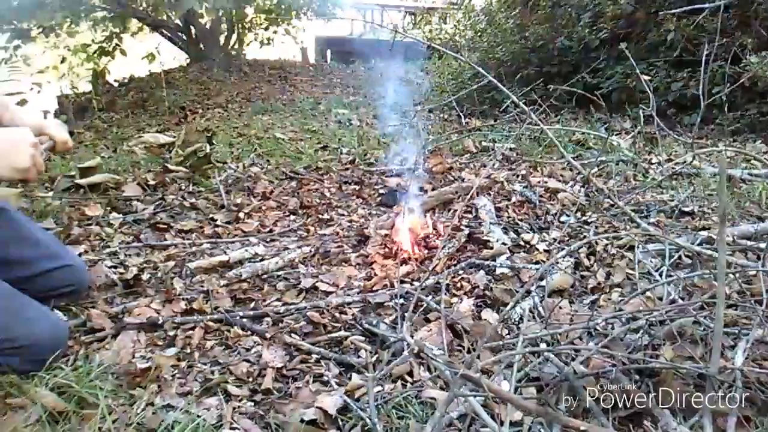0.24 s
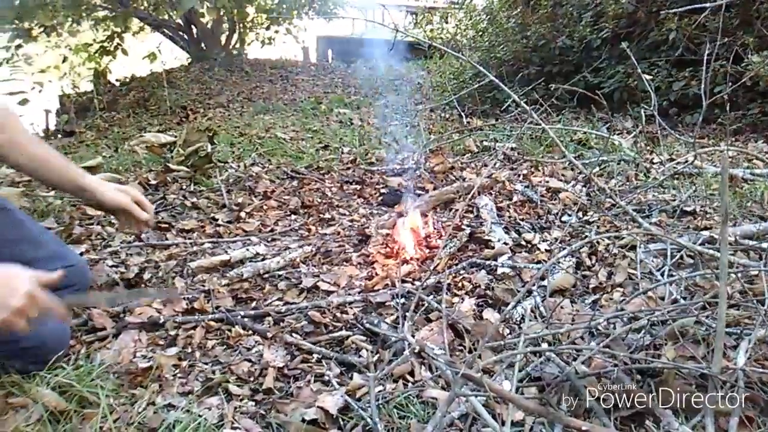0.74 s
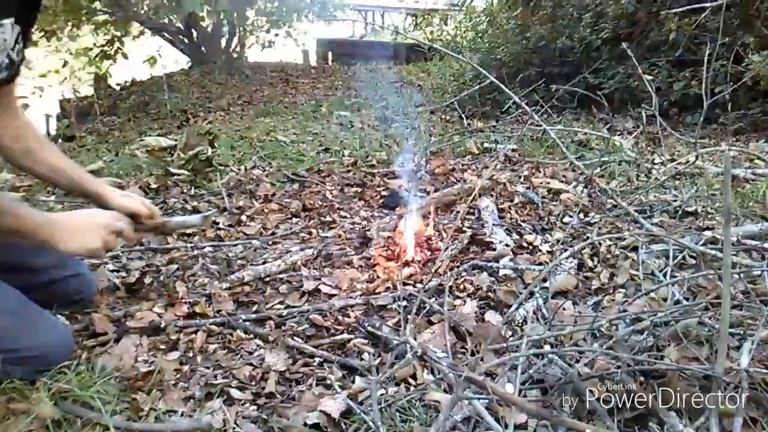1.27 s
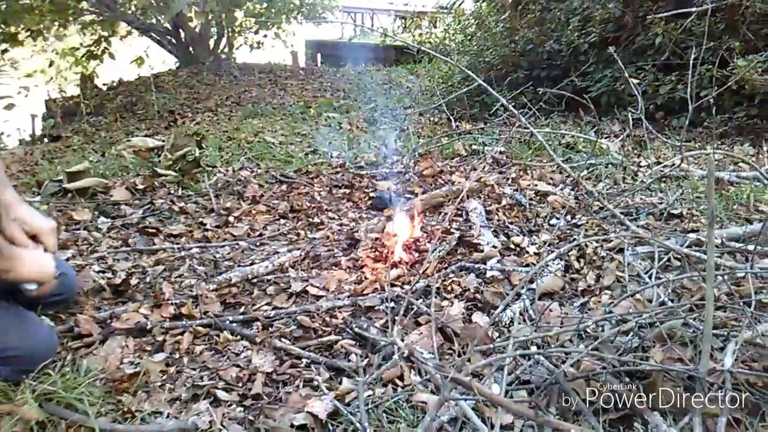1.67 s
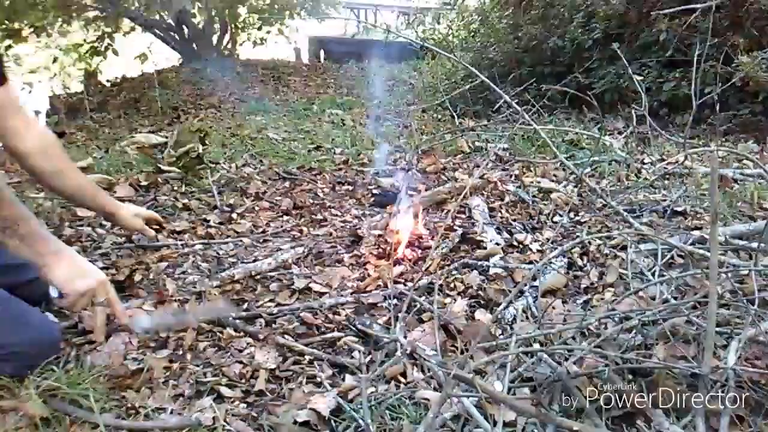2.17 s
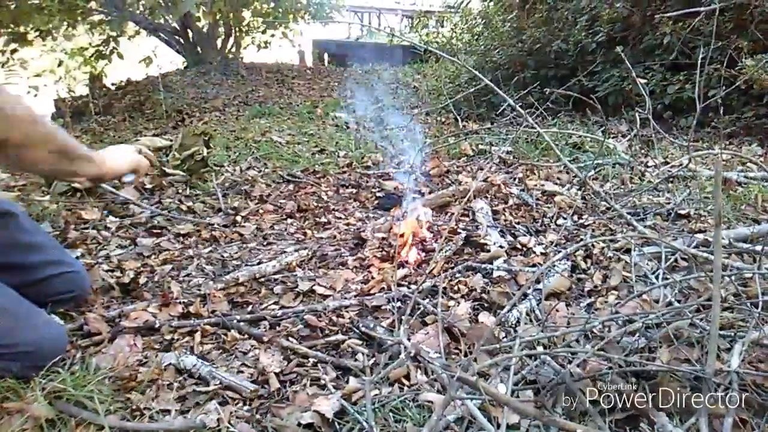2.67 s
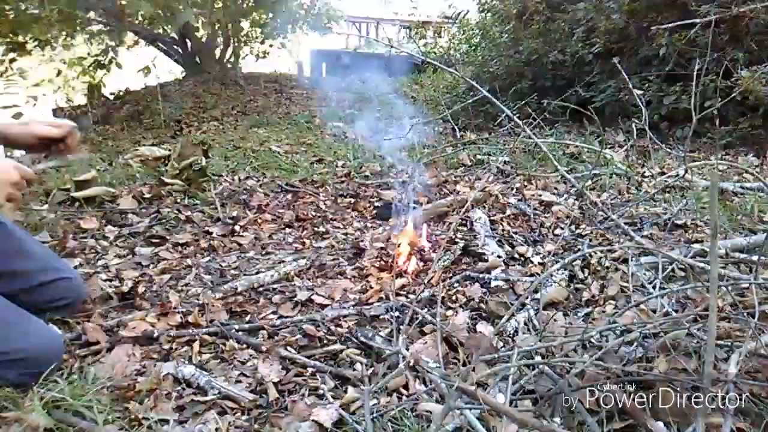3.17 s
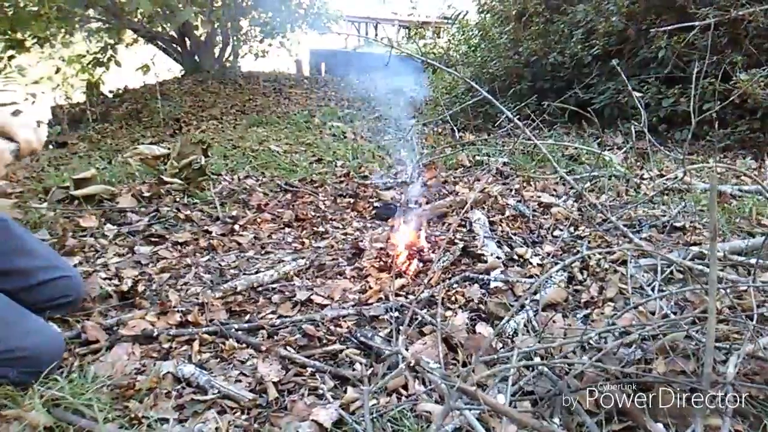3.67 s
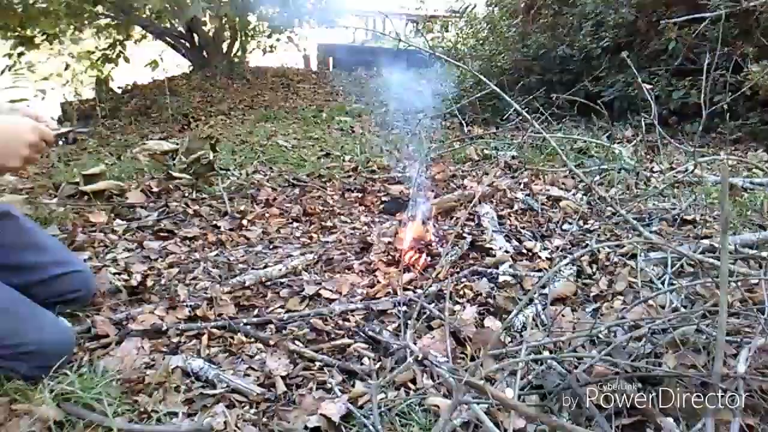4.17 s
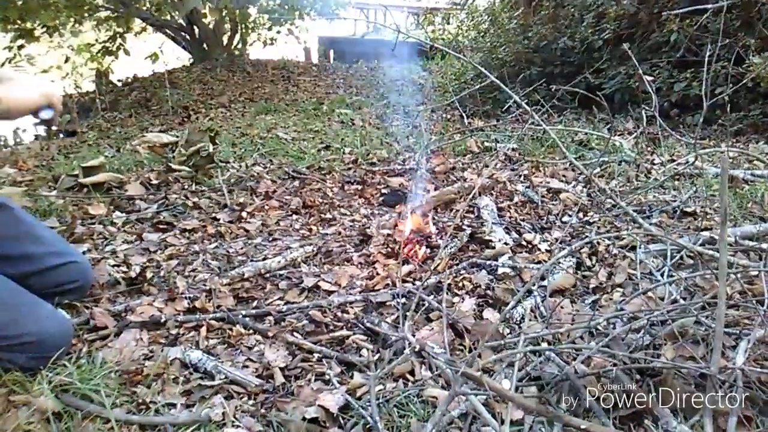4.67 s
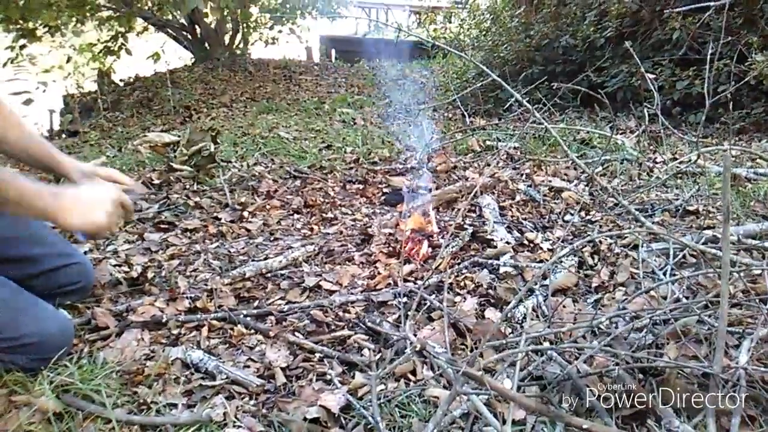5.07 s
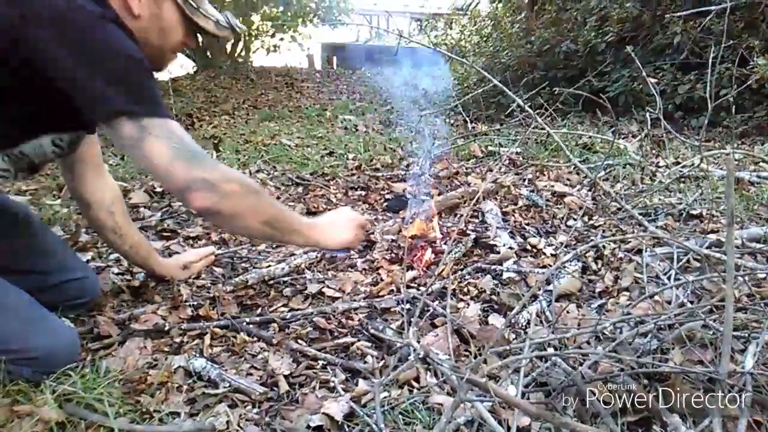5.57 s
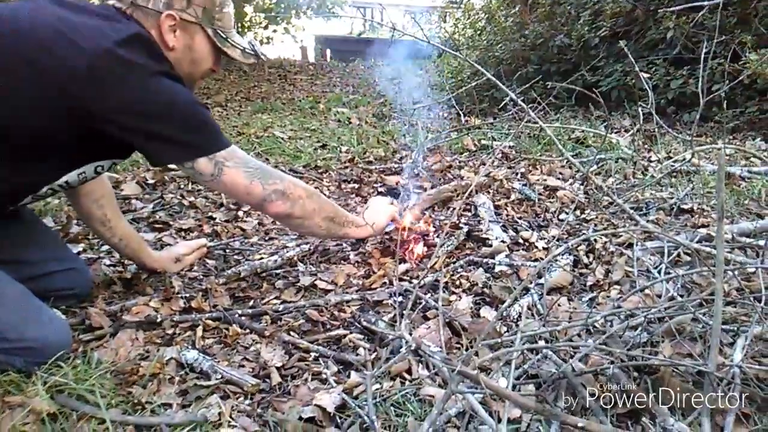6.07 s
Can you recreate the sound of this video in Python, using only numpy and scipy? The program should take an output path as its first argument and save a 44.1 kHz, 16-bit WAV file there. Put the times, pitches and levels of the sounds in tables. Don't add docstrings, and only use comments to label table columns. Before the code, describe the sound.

Outdoors, hands rustle and break brittle twigs beside a faintly fizzing fire, with brief cricket trills and a sharp double-edged snap past the middle.

```python
import sys
import numpy as np
from scipy import signal
from scipy.fft import rfft, irfft, next_fast_len
from scipy.io import wavfile
from scipy.ndimage import uniform_filter1d, minimum_filter1d

SR = 44100
rng = np.random.default_rng(int(sys.argv[2]) if len(sys.argv) > 2 else 0)


def master_out(mix):
    frames = np.transpose(np.atleast_2d(mix))
    ceiling = np.clip(frames, -1, 1)
    pcm = np.round(ceiling * 32767).astype(np.int16)
    wavfile.write(sys.argv[1], SR, pcm)


def how_loud(loudness_db):
    steps = np.asarray(loudness_db, float) / 20
    return 10 ** steps


N = 278712


def colour(x, points):
    size = next_fast_len(x.shape[-1])
    hz = np.fft.rfftfreq(size, 1 / SR)
    f, db = np.transpose(points)
    gain = how_loud(np.interp(np.log(hz + 1), np.log(f), db, left=-90, right=-90))
    return irfft(rfft(x, size) * gain, size)[..., :x.shape[-1]]


def evened(x):
    return x / np.sqrt(np.mean(x ** 2) + 1e-20)


def curve(rows):
    s, value = np.transpose(rows)
    return np.interp(np.arange(N) / SR, s, value)


def resonate(x, hz, width_hz):
    turn = np.exp(2j * np.pi * np.cumsum(hz * np.ones(x.shape[-1])) / SR)
    r = np.exp(-np.pi * width_hz / SR)
    low = signal.lfilter([1 - r], [1, -r], x / turn)
    low = signal.lfilter([1 - r], [1, -r], low)
    return 2 * (turn * low).real


def drift(per_s):
    size = max(round(SR / per_s), 1)
    return evened(uniform_filter1d(uniform_filter1d(rng.standard_normal((2, N)), size), size))


def swell(s, db, rise_ms, fall_ms):
    age_ms = 1000 * (np.arange(4, N + 8, 8) / SR - s)
    drop = np.maximum(-age_ms / rise_ms, age_ms / fall_ms)
    return np.repeat(how_loud(2 * db - 40 * drop), 8)[:N]


# t/s, left microphone delay/samples
LEFT_LAG = [(.3, 13), (1.0, 8), (1.3, 7), (1.9, 10), (2.4, 6.8), (2.9, 7), (3.04, 9), (3.2, 9), (3.9, 11),
            (4.4, 9.4), (5.3, 8), (5.6, 6.6)]
# f/Hz, share [0-1]
UNSHARED = [(1500, .25), (3600, .22), (5000, .5), (8000, .65), (14000, .75)]
# f/Hz, level/dB
CASE_SHADOW = [(20, -9), (8000, 2.5), (11000, -4.5), (22000, -5)]


def spaced(x, pan_db, start=0):
    at = np.arange(x.shape[1])
    pan_db = np.clip(pan_db, -10, 3)
    lag = np.round(np.interp((start + at) / SR, *np.transpose(LEFT_LAG))).astype(int)
    shared_db = [(f, 10 * np.log10(1 - u ** 2)) for f, u in UNSHARED]
    alone_db = [(f, 20 * np.log10(u)) for f, u in UNSHARED]
    shared = colour(x[0, at - lag], [(20, 0)] + shared_db + [(SR, -3)])
    alone = colour(x[1], [(20, -20)] + alone_db + [(SR, -3)])
    left = colour(shared + alone, CASE_SHADOW)
    return np.array([left * how_loud(pan_db / 2), x[0] * how_loud(-pan_db / 2)])


# peak t/s, level/dB, rise/ms, fall/ms
PUFFS = [(.1, -67.5, 100, 54), (.24, -69, 140, 98), (.49, -66, 310, 120), (.6, -74.5, 91, 870),
         (1.1, -76, 400, 360), (1.32, -70, 250, 105), (1.61, -64, 190, 88), (1.97, -70, 300, 74),
         (2.38, -73, 370, 180), (2.54, -63, 410, 180), (2.86, -71, 190, 76), (3.16, -58.5, 150, 67),
         (3.37, -63, 190, 115), (3.7, -71.5, 330, 220), (4.07, -68, 65, 160), (4.27, -71, 100, 82),
         (4.49, -69.5, 150, 100), (4.9, -76, 500, 520), (5.4, -71, 180, 280), (5.63, -67.5, 340, 270),
         (5.98, -68.5, 280, 200), (6.21, -70, 130, 220)]
# f/Hz, level/dB
WIND_SPECTRUM = [(12, -33), (20, -24), (30, -19), (48, -0.5), (65, 1.5), (161, -10.5), (200, -12.5),
                 (300, -20.5), (390, -36), (660, -120)]


def wind(lumps):
    breeze_db = -79
    level = np.sqrt(how_loud(2 * breeze_db) + sum(swell(*row) for row in PUFFS))
    noise = evened(colour(rng.standard_normal((2, N)), WIND_SPECTRUM))
    side = how_loud(np.array([[-.9], [.9]]))
    return level * how_loud(6.0 + 2.6 * lumps) * noise * side


# f/Hz, level/dB
HUM_SPECTRUM = [(71, -30.5), (120, 0), (257, -2.5), (349, -7), (661, -8.5), (791, -9.5), (947, -12),
                (1270, -18.5), (2680, -16), (3300, -19), (4290, -60.5), (7260, -120)]
# t/s, level/dB
HUM_LEVEL = [(0, -72.5), (.8, -77), (1.3, -72.5), (1.78, -78), (2.64, -71.5), (2.92, -80), (3.29, -74),
             (3.75, -76), (6.32, -75)]


def hum(lumps):
    noise = rng.standard_normal((2, N))
    noise = noise + 0.042 * noise[::-1]
    return how_loud(curve(HUM_LEVEL) + 6.0 + 2.4 * lumps) * evened(colour(noise, HUM_SPECTRUM))


# f/Hz, level/dB
HISS_SPECTRUM = [(2500, -28.5), (5000, -9), (7500, 0.5), (11000, -3.5), (16000, -1)]


def hiss():
    level_db = -68.5 + 3.8 * drift(0.99)[0]
    return how_loud(level_db) * evened(colour(rng.standard_normal((2, N)), HISS_SPECTRUM))


# t/s, level/dB
FLAME_FIZZ = [(0, -87), (.9, -119), (1.05, -87), (1.5, -69), (2.4, -99), (2.85, -97), (3.2, -83),
              (3.84, -66), (3.92, -82), (4.38, -90), (4.6, -85), (4.86, -73), (5.2, -90), (5.5, -68),
              (5.9, -70), (6.32, -77.5)]
# peak t/s, level/dB, rise/ms, fall/ms, woody body re level/dB
HANDFULS = [(.24, -66.5, 1100, 1500, -7), (.463, -55.5, 68, 69, -16), (.712, -58, 10, 190, -4.5),
            (1.074, -41, 21, 135, -5.5), (1.276, -43.5, 54, 125, -8), (1.624, -62, 36, 190, -3),
            (1.939, -67, 530, 520, -10), (2.172, -51, 17, 130, -15), (2.218, -48, 68, 28, -14),
            (2.436, -27.5, 11.2, 41, -4.5), (2.472, -37, 24, 216, -6.5), (2.586, -44.5, 150, 124, -5),
            (2.577, -38, 14, 30, -8), (3.068, -51, 23, 56, -17), (3.582, -47, 12, 50, -8),
            (4.486, -52, 11, 60, -2.5), (3.138, -34.5, 26, 16, -6.5), (3.15, -54, 11, 220, 0),
            (3.859, -50.5, 20, 42, -32), (3.945, -59, 19, 110, -5), (3.991, -23.5, 7.8, 19, -22),
            (4.005, -40, 11, 120, -13), (4.127, -69, 100, 320, -5), (4.448, -55.5, 52, 140, -7),
            (5.064, -65.5, 60, 105, -25), (5.45, -64.5, 130, 150, -20), (3.081, -50, 8, 25, -17),
            (5.268, -76, 5.7, 160, -22), (5.598, -43.5, 26, 130, -8), (6.212, -63, 15, 900, -4.5)]
# peak t/s, share/dB, rise/ms, fall/ms
SETTLING = (3, -3, 41, 247.5)
# f/Hz, level/dB
LEAF_SPECTRUM = [(2600, -26), (3600, -6), (5500, -1), (7500, 0), (10000, 3), (13000, -1.5), (16000, -11.5)]
# f/Hz, level/dB
BODY_SPECTRUM = [(450, -15), (800, -6), (1300, -4.5), (2300, 4), (2900, 7.5), (4200, 4), (6000, -33.5)]


def patchy(leaf, depth_db):
    z = signal.stft(leaf, nperseg=256)[2]
    patches = rng.standard_normal(z[0].shape)
    patches = uniform_filter1d(patches, size=6, axis=0)
    patches = evened(uniform_filter1d(patches, size=8, axis=1))
    return evened(signal.istft(z * how_loud(depth_db * patches), nperseg=256)[1][:, :N])


def rustle():
    fizz_body_db = -18
    fizz = how_loud(2 * curve(FLAME_FIZZ))
    crush = [swell(*row[:4]) for row in HANDFULS]
    level = np.sqrt(fizz + sum(crush))
    crush_body = sum(p * how_loud(2 * row[4]) for p, row in zip(crush, HANDFULS))
    woody = np.sqrt(fizz * how_loud(2 * fizz_body_db) + crush_body)

    ticks_per_s = 700
    tick_size = how_loud(4.5 * np.minimum(rng.exponential(1, (2, N)), 3.2))
    ticks = tick_size * (rng.random((2, N)) < ticks_per_s / SR)
    clumps = uniform_filter1d(uniform_filter1d(ticks, size=30), size=30)
    dull, bright = evened(clumps * how_loud(1.1 * drift(68)))

    noise = rng.standard_normal((2, 2, N))
    low = evened(resonate(noise[0] * (dull + 1.7), 5500, 4500))
    high = evened(noise[1] * (bright + 1.9))
    settle = np.sqrt(swell(*SETTLING))
    leaf = (0.14 + 1.2 * settle) * low + (1 - .7 * settle) * high
    leaf = patchy(evened(colour(leaf, LEAF_SPECTRUM)), depth_db=2)
    body = woody / level * evened(colour(noise[0] * (dull + 1.5), BODY_SPECTRUM))
    return how_loud(-0.5) * level * spaced(leaf + body, -0.56)


# t/s, level/dB
CHORUS_LEVEL = [(0, -74.5), (.33, -65.5), (.81, -75.5), (1.02, -105), (1.21, -61), (1.45, -78), (1.9, -78),
                (2.53, -66), (2.76, -89), (3.2, -72.5), (4.12, -70.5), (4.45, -81.5), (4.65, -73),
                (5.0, -67.5), (5.15, -82.5), (5.38, -80), (5.76, -72), (6.32, -73)]


def chorus():
    hz = 3902 * (1 + 0.026 * drift(2.2)[0])
    noise = rng.standard_normal((2, 2, N))
    far = evened(resonate(noise[0], hz, 330)) + .45 * evened(resonate(noise[1], 4070, 110))
    return how_loud(curve(CHORUS_LEVEL) + 5.5) * how_loud(2 * drift(60)) * far


def whine():
    level_db = -80.5 + 2 * drift(2.1)
    return how_loud(level_db) * evened(resonate(rng.standard_normal((2, N)), 13500, 70))


# first stroke t/s, last t/s, strokes/s, f/Hz, left-right level/dB
NEAR_TRILLS = [
    (.096, .525, 34.5, 3730, 12),
    (.927, 1.33, 35.2, 3690, -4),
    (3.054, 3.49, 34.5, 3730, 12),
    (5.7815, 6.28, 34.4, 3730, 13),
]
NEAR_TRILL_DB = [-67.5, -65, -67.5, -70.5]


def crickets():
    out, t = np.zeros((2, N)), np.arange(N) / SR
    arch = .2
    for (s0, s1, per_s, hz, pan_db), db in zip(NEAR_TRILLS, NEAR_TRILL_DB):
        turn = (t - s0) * per_s
        u = np.clip((turn % 1 - .02) / .74, 0, 1)
        stop = np.sin(np.pi / 2 * np.minimum((1 - u) / .2, 1))
        stroke = np.minimum(u / .5, 1) * (.7 + .3 * u) * stop
        strength = how_loud(.8 * rng.standard_normal(40))[np.clip(turn, 0, 39).astype(int)]
        pitch_hz = hz * (1.006 - arch * (u - .48) ** 2 + .003 * drift(200)[0])
        blur = evened(resonate(rng.standard_normal(N), hz, 300))
        tone = np.sin(2 * np.pi * np.cumsum(pitch_hz) / SR) + .3 * blur
        song = how_loud(db + 15.5) * tone * stroke * strength * (t > s0) * (t < s1)
        out += np.array([how_loud(pan_db / 2) * song, how_loud(-pan_db / 2) * np.roll(song, 4)])
    return out


# t/s, level/dB, length/ms, woody body re level/dB
HAND_TWIGS = [(0.1012, -35.5, 0.55, -30), (0.185, -41, 1.1, -9.5), (0.23, -38, 1.9, -9.5),
              (0.2933, -37.5, 1.34, -5.5), (1.0548, -34.5, 1.3, -28), (1.073, -31, 4.2, -10),
              (1.0766, -29.5, 6.2, -17), (1.0806, -25, 2.4, -11.5), (1.0852, -30.5, 5.2, -6),
              (1.781, -41.5, 3.3, -14.5), (2.427, -31.5, 1.8, -5), (2.4331, -24, 1.6, -17),
              (2.439, -31.5, 1.3, -4), (2.4422, -29, 1.1, -9), (2.4437, -20.5, 2.4, -10),
              (2.4478, -23, 1.5, -27), (2.5415, -35, 1.3, -13.5), (2.5766, -28, 1.8, -15.5),
              (2.6702, -35, 0.94, -18), (2.9965, -36, .8, -30), (3.1255, -19.5, 1.53, -17),
              (3.1328, -29, 1.5, -6), (3.1384, -27.5, 2.7, -8), (3.5835, -25.5, 1.8, -14.5),
              (3.8643, -44, 3.2, -1), (4.092, -30.5, .9, -20), (4.4156, -38.5, 5.4, -8.5),
              (4.444, -27.5, 1, -7.5), (5.271, -39, 1.7, -14), (5.6086, -42, 2.5, 0)]
# t/s, peak level/dB, brightest f/Hz, length/ms
SPLINTER_CRACKS = [(0.2196, -41.5, 6900, 2.9), (1.969, -47.5, 5300, 4.7), (2.4014, -59, 8000, 3),
                   (2.49, -48, 6300, 1.7), (2.676, -34, 7400, 3.5), (2.986, -55, 7600, 5.3),
                   (3.0745, -39, 9000, 1.6), (3.1111, -32, 9700, 3.1), (3.122, -34, 8600, 3.7),
                   (3.9594, -38, 9700, 3.5), (3.965, -33, 9990, 2.5), (4.012, -34, 6100, 3.1),
                   (4.021, -37.5, 8000, 2), (4.03, -34.5, 6920, 2), (4.3961, -45.5, 9900, 3.5),
                   (4.4077, -45, 8000, 4.3), (4.448, -33, 6060, 1.4), (5.5975, -39, 7600, 6.9)]
# t/s, peak level/dB, brightest f/Hz, length/ms
LEAF_CRACKS = [(.351, -44.5, 6460, 4.2), (.4524, -45, 6220, 3), (.458, -51, 7610, 2.3),
               (.4717, -34, 8050, 2.7), (.5614, -53.5, 6020, 3), (.7088, -54, 8410, 2.5),
               (1.2532, -39, 7490, 3.2), (1.272, -37, 6200, 2.5), (1.4268, -40.5, 7750, 2.5),
               (1.4469, -51, 5480, 3.6), (1.512, -52, 10100, 2.6), (1.5393, -49.5, 6250, 3.2),
               (1.633, -46, 4600, 3), (1.6994, -49.5, 10300, 3.6), (1.85, -55, 9140, 2.7),
               (1.8687, -50, 5800, 4), (2.0492, -49, 12000, 2.7), (2.165, -48, 5290, 2.4),
               (2.176, -38, 5300, 5.2), (2.7057, -39.5, 7200, 2.4), (3.069, -38, 8400, 1.5),
               (3.1072, -41, 8450, 2.4), (3.5139, -62, 10100, 2.5), (3.542, -53, 8210, 2.5),
               (3.549, -40, 7900, 3.3), (3.555, -47, 9580, 3.2), (3.7444, -53, 9430, 2.5),
               (3.8926, -43, 7910, 2.6), (3.9444, -37, 9820, 2.5), (4.1407, -43.5, 7150, 2.9),
               (4.6588, -41, 8050, 1.75), (4.6712, -38.5, 9600, 1.8), (5.0517, -46, 12400, 2.3),
               (5.0572, -46, 8120, 2.5), (5.6615, -38, 6030, 2.5), (5.6716, -35, 7460, 1.9),
               (5.689, -39.5, 6000, 1.7), (5.9015, -42, 10100, 2.9), (5.9234, -36, 11600, 2.9)]
# t/s, peak level/dB, brightest f/Hz, length/ms
STEM_POPS = [(0.3706, -44.5, 6000, 6), (1.2015, -43.5, 8500, 3.6), (1.2844, -40, 5960, 2.8),
             (1.321, -39.5, 4740, 6.1), (1.4699, -47.5, 6800, 2.8), (1.612, -40.5, 12100, 2.9),
             (1.9364, -48, 8400, 2.3), (1.9628, -41, 5540, 2.3), (2.6048, -36.5, 6030, 2.8),
             (2.6388, -39, 6660, 2.8), (2.6967, -47, 6550, 2.8), (2.7252, -50, 7400, 2.5),
             (2.7498, -49, 7640, 2.8), (2.8454, -56, 7340, 2.8), (3.0579, -43.5, 6570, 2.1),
             (3.2884, -37, 12700, 1.2), (3.6513, -47, 8350, 3.7), (3.771, -46, 8900, 3.6),
             (3.8457, -68, 9100, 2.5), (3.855, -42.5, 5600, 3.6), (4.116, -44, 11000, 1.5),
             (4.26, -40.5, 6260, 2.1), (4.4866, -33.5, 9800, 3.1), (4.5979, -43.5, 11800, 2),
             (4.8614, -49, 9000, 2.5), (5.292, -50, 10900, 2.3), (5.5888, -38, 7700, 1.6),
             (5.6204, -41, 7700, 2.9), (5.6364, -41.5, 6050, 3.3), (5.6784, -47, 6080, 2.5)]
# t/s, level/dB, length/ms, woody body re level/dB, left-right level/dB
THICK_BREAK = [
    (3.975, -23.5, 1.8, -20.5, -16),
    (3.9864, -13, 3.7, -19, -12.5),
    (3.9901, -21, 1.1, -19, 4),
    (3.9927, -15, 0.99, -10, -1),
    (3.995, -11, 1.6, -11, 9.5),
    (3.998, -26.5, 2.1, -24.5, -4),
]


def cracks():
    peak_over_db = 6
    big_ring, small_ring = 0.43, .9
    kinds = (LEAF_CRACKS + SPLINTER_CRACKS, -21.5), (STEM_POPS, -5)  # events, body/dB
    small = [(s, db - peak_over_db, ms, body_db, hz, small_ring)
             for rows, body_db in kinds for s, db, hz, ms in rows]
    loose = [row + (7600, big_ring) for row in HAND_TWIGS] + small
    held = np.arange(len(loose)) < len(HAND_TWIGS)
    scatter = np.where(held, .4, 1)
    pan_db = -4.5 + 7.5 * rng.standard_normal(len(loose)) * scatter
    thick = [row[:4] + (9300, big_ring, row[4]) for row in THICK_BREAK]
    return thick + [row + (p,) for row, p in zip(loose, pan_db)]


def snaps():
    size = 2048
    out, t = np.zeros((2, N + size)), np.arange(size) / SR
    for s, db, ms, body_db, kind_hz, ring, pan_db in cracks():
        noise = rng.standard_normal((5, size))
        hz = kind_hz * np.exp(0.11 * noise[4, 0])
        breaks = how_loud(0.94 * evened(uniform_filter1d(noise[4], size=24)))
        leaf = evened(colour(noise[:2], LEAF_SPECTRUM))
        leaf = leaf + ring * evened(resonate(noise[:2], hz, 2600))
        shape = np.exp(-t / (0.0011 * ms)) * np.minimum(t / (0.00033 * ms), 1)
        burst = leaf * breaks * shape
        burst = burst / np.sqrt(np.mean(burst[:, :256] ** 2) / np.mean(shape[:256] ** 2))
        knock_shape = np.exp(-t / (.0015 + .7e-3 * ms)) * np.sin(np.pi / 2 * np.minimum(t / .0012, 1)) ** 2
        knock = evened(colour(noise[2:4], BODY_SPECTRUM)) * knock_shape
        at = round(s * SR) - 30
        crack = spaced(burst + how_loud(body_db) * knock, pan_db, start=at)
        out[:, at:at + size] += how_loud(db + 2.0) * crack
    return out[:, :N]


# t/s, level/dB, f/Hz, t60/s
WOOD_RINGS = [(3.9866, -21, 5600, .012), (3.9935, -19, 5640, .016), (3.995, -23, 4000, .014),
              (1.078, -50, 480, .04), (3.128, -50, 420, .04), (4.0995, -50, 4000, .04),
              (4.51, -52, 1800, .012), (3.1262, -27, 3450, .018), (3.139, -33, 3100, .014),
              (3.988, -25, 4300, .012), (4.0923, -33, 10200, .009), (4.0925, -41, 5000, .008),
              (4.004, -40, 2700, .03), (1.7812, -48, 4800, .012), (4.499, -54, 1500, .012),
              (0.29, -38, 1820, 0.011), (0.292, -45, 1250, 0.015), (1.938, -44, 1370, 0.017),
              (1.9395, -53, 560, 0.015), (3.864, -32, 2990, 0.012), (3.986, -21, 2405, 0.033),
              (3.994, -36, 950, .02), (4.038, -48, 3400, .04), (4.054, -48, 3350, .05),
              (4.261, -48, 2700, .015), (4.443, -38, 645, 0.02), (4.4862, -40, 1645, 0.016),
              (5.2696, -37, 6200, 0.009)]
# (f/Hz, width/Hz, level/dB)
TWIG_SCRAPE = (2.155, 2.226, -47.5), [(1620, 340, -7.5), (3580, 820, 7), (5300, 1000, 3)]


def scrape():
    t = np.arange(N) / SR
    (s0, s1, db), modes = TWIG_SCRAPE
    slips = rng.standard_normal(N) * how_loud(2.5 * drift(400)[0])
    sag = 1 - .17 * np.clip((t - s0) / (s1 - s0), 0, 1)
    rub = evened(sum(how_loud(d) * evened(resonate(slips, hz * sag, width)) for hz, width, d in modes))
    return how_loud(db) * rub * np.clip((t - s0) / 0.025, 0, 1) ** 1.3 * np.clip((s1 - t) / 0.01, 0, 1)


def sticks():
    out, age = np.zeros(N), np.arange(SR // 8) / SR
    for s, db, hz, t60 in WOOD_RINGS:
        ring = np.sin(2 * np.pi * hz * age) * np.minimum(age / 0.00053, 1)
        out[round(s * SR):][:len(age)] += how_loud(db - 60 * age / t60) * ring
    out += scrape()
    return spaced(np.array([out, out]), -2.2)


# f/Hz, t60/s
ECHO_T60 = [(500, 0.06), (2500, 0.24), (7000, 0.31), (14000, 0.05)]


def trees(x):
    hz, t, z = signal.stft(rng.standard_normal((2, SR // 3)), SR, nperseg=128)
    band_hz, band_t60 = np.transpose(ECHO_T60)
    t60 = np.interp(np.log(hz + 1), np.log(band_hz), band_t60)
    tail = signal.istft(z * how_loud(-60 * t / t60[:, None]), SR, nperseg=128)[1]
    return signal.fftconvolve(x, tail / np.linalg.norm(tail[0]), axes=1)[:, :N]


def scene():
    lumps = drift(9)
    far = wind(lumps) + hum(lumps) + hiss() + chorus() + whine()
    leaves = rustle()
    near = crickets()
    twigs = snaps() + sticks()
    echo = how_loud(-14) * trees(twigs) + how_loud(-12) * trees(near)
    return far + leaves + near + twigs + echo


def smooth_db(power, size, axis):
    return 10 * np.log10(uniform_filter1d(power, size=size, axis=axis) + 1e-20)


def drop_masked(x, top_hz):
    turn = np.array([[1, 1], [1, -1]]) / np.sqrt(2)
    hz, t, z = signal.stft(turn @ x, SR, nperseg=2048)
    power = abs(z) ** 2
    band_db, wide_db = smooth_db(power, 7, 1), smooth_db(power, 16, 1)
    both_db = smooth_db(power.mean(0), 30, 0)
    nearby_db = -minimum_filter1d(-both_db, size=70, axis=0, origin=12)
    uneven_db = 2.5 * evened(uniform_filter1d(rng.standard_normal(both_db.shape), size=10, axis=0))
    masked = band_db < nearby_db - 19 + 2.4 * uneven_db
    masked |= wide_db < wide_db[::-1] - 8.5 + uneven_db
    masked &= ((hz > 2400) & (hz < 7000))[:, None]
    quiet_db = (-62 - wide_db[:, 480:640].mean((0, 1))).clip(0, 30)
    ragged_hz = top_hz + 500 + 110 * uneven_db[0] - 18 * quiet_db
    masked |= (hz[:, None] > ragged_hz) & (hz < top_hz + 300)[:, None]
    kept = np.where(masked, 0, z) * (hz < 15900)[:, None]
    return turn @ signal.istft(kept, SR, nperseg=2048)[1][:, :N]


def top_on_attacks(x, top_hz):
    lowpass = signal.firwin(511, top_hz, fs=SR, window=("kaiser", 9))
    low = signal.oaconvolve(x, lowpass[None], "same")
    power = ((x - low) ** 2).sum(0)
    attack = uniform_filter1d(power, size=64) > 5.5 * uniform_filter1d(power, size=2000)
    gate = np.clip(uniform_filter1d(1. * attack, size=400) * 8, 0, 1)
    return low + how_loud(-7) * gate * (x - low)


def band_limit(x):
    return signal.sosfilt(signal.butter(12, 16260, fs=SR, output="sos"), x)


def record(dry):
    top_hz = 14250
    limited = np.tanh(how_loud(np.array([[-1.8], [-.7]])) * dry)
    mix = top_on_attacks(drop_masked(limited, top_hz), top_hz)
    return band_limit(mix)


dry = scene()
out = record(dry)
master_out(out)
```